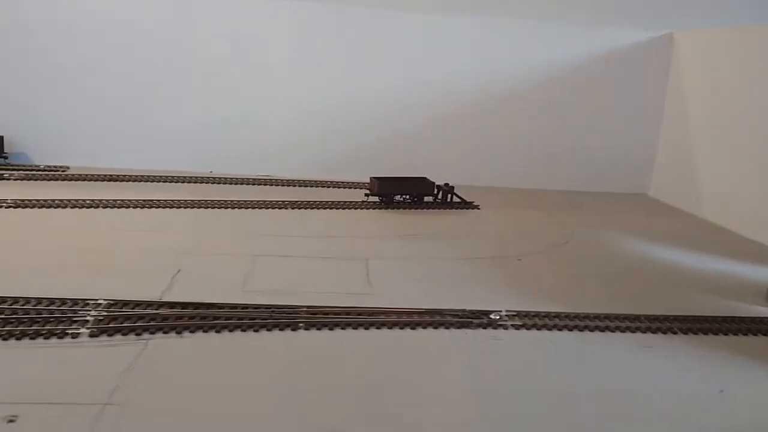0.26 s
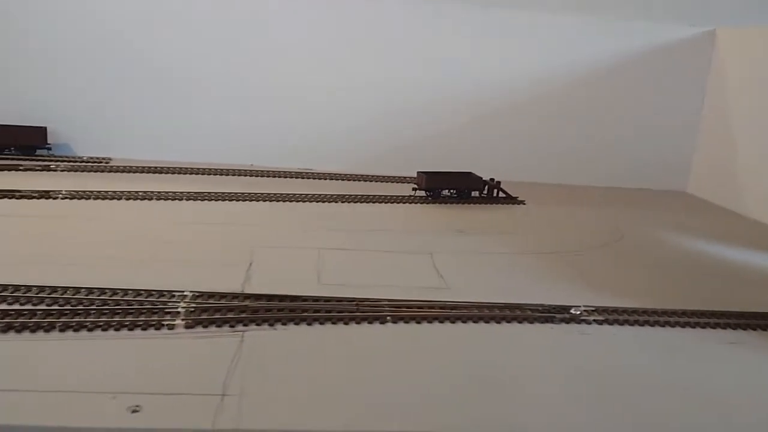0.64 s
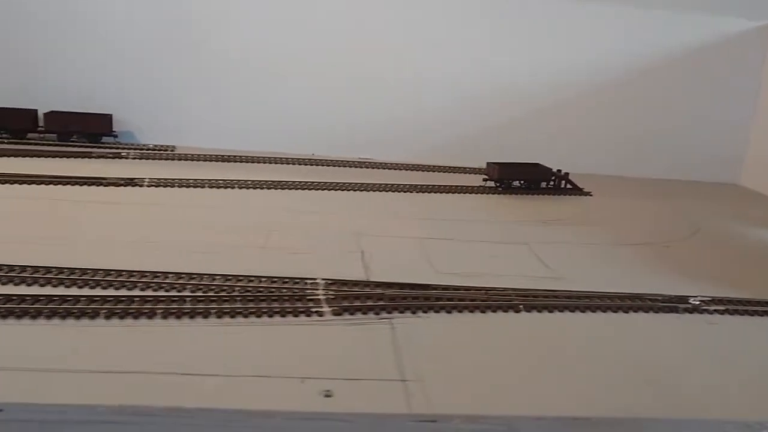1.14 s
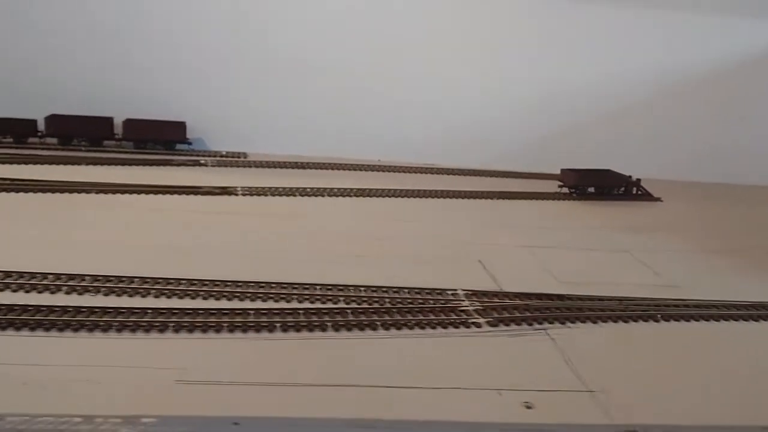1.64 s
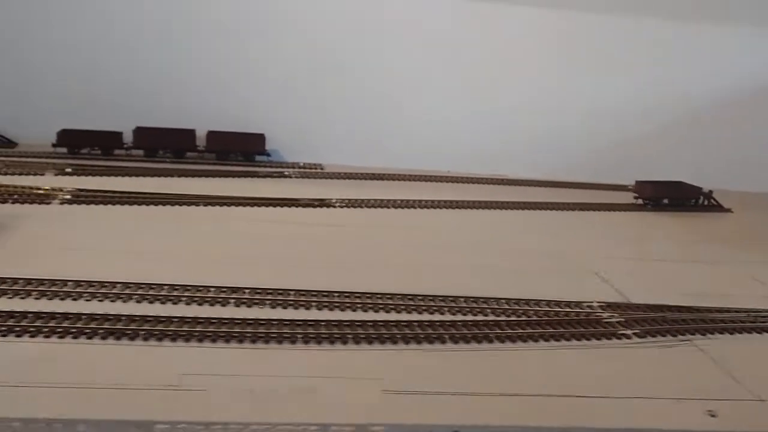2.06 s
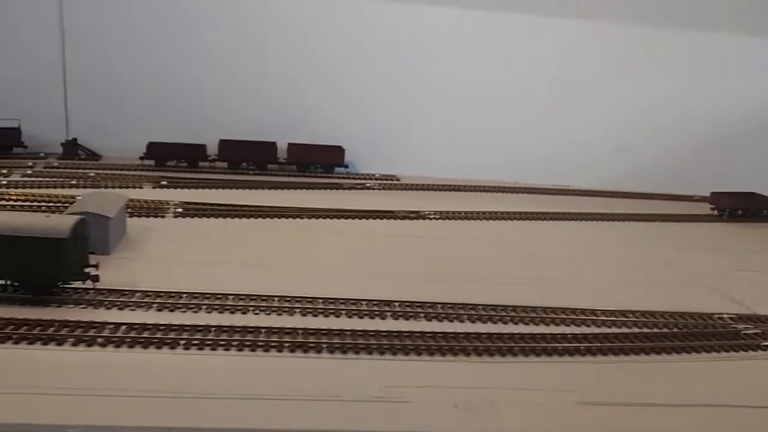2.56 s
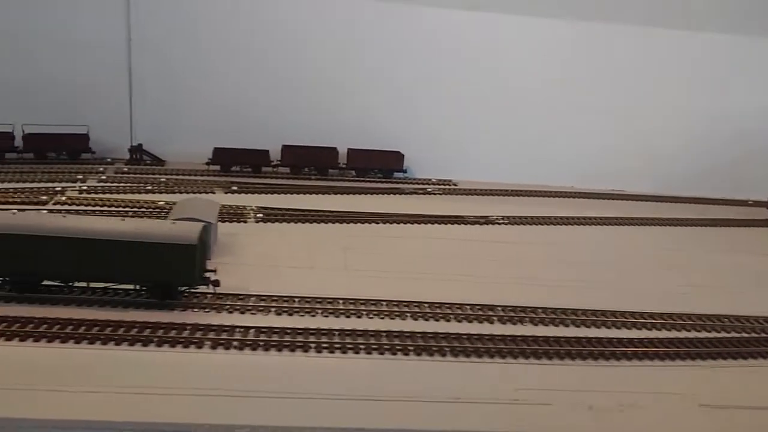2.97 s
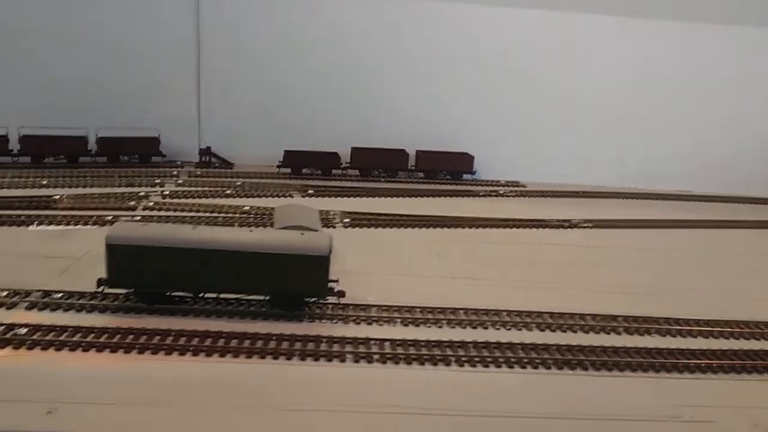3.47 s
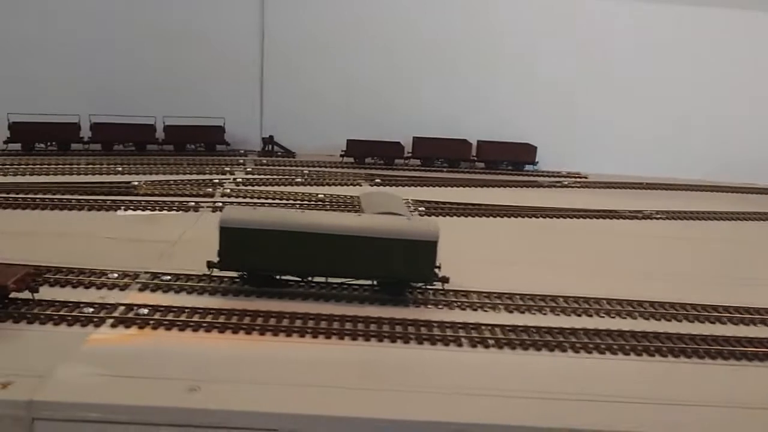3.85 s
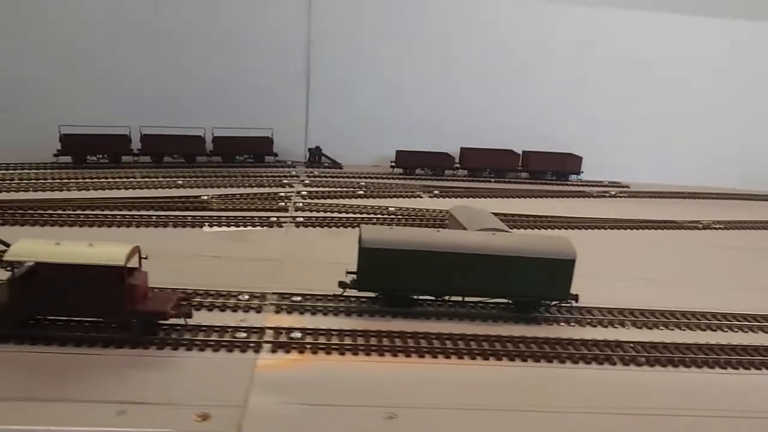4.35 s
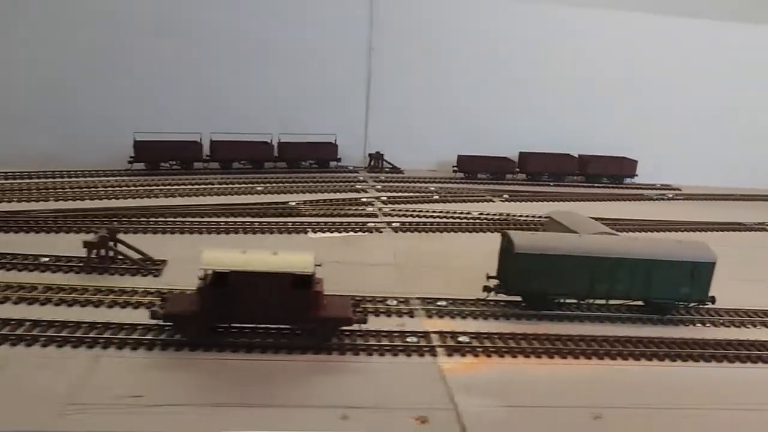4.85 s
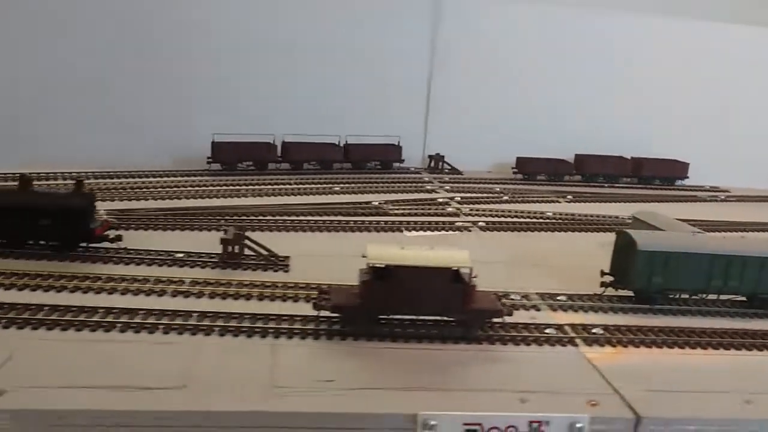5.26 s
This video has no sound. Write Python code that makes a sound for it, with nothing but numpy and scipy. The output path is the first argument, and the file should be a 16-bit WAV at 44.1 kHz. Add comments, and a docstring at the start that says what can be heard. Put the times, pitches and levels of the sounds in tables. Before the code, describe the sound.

A steady electrical hum runs indoors while fingers shift on a small carried camera, making scattered knocks, sharp clicks and faint rustles.

```python
"""A quiet room with a model railway, where something electrical hums and a small camera is carried along.
Shifts of the grip knock and click on its case and set it shuddering; fingertips pop beside the left
microphone port (the opening for the sound). Under them lie the rumble of the hand, skin brushing
the case, nail scrapes, a sliding sleeve, faint squeaks and the hiss of the two microphones."""
import sys
import numpy as np
from scipy import signal
from scipy.fft import rfft, irfft, next_fast_len
from scipy.io import wavfile
from scipy.ndimage import uniform_filter1d, map_coordinates

SR = 44100
rng = np.random.default_rng(int(sys.argv[2]) if len(sys.argv) > 2 else 0)


def store_wav(level_fs):
    """Save 16-bit WAV to argv[1]."""
    pcm = np.round(np.clip(np.atleast_2d(level_fs), -1, 1) * 32767)
    wavfile.write(sys.argv[1], SR, pcm.T.astype(np.int16))


N = 242991
TIME = np.arange(N) / SR
AGE = np.arange(SR // 6) / SR  # seconds since a touch
HZ = np.fft.rfftfreq(next_fast_len(N + SR // 2), 1 / SR)


def amp(db):
    """Turn decibels into a gain, the number a sound is multiplied by."""
    return 10 ** (np.asarray(db) / 20)


def unit(x):
    """Scale to an average (rms) strength of 1."""
    return x / np.sqrt(np.mean(x ** 2) + 1e-20)


def crest(x):
    """Scale to a peak of 1."""
    return x / np.abs(x).max()


def panned(db, lean_db):
    """Left and right gain. A lean above 0 turns the right side down; below 0, the left."""
    return amp(db + np.minimum([[lean_db], [-lean_db]], 0))


def add(track, s, sound):
    """Mix a stereo sound in at s seconds."""
    start = round(s * SR)
    track[:, start:start + sound.shape[-1]] += sound[:, :N - start]


def swells(rows):
    """A gain that rises and falls in smooth bell shapes."""
    return sum(amp(db) * np.exp(-((TIME - s) / half_length) ** 2) for s, half_length, db in rows)


def wobble(rate):
    """A smooth curve through rate random points a second."""
    points = rng.standard_normal(int(N * rate / SR) + 4)
    return map_coordinates(points, [TIME * rate])


def gains(colour, hz):
    """Left and right gain at each pitch, read from a tone colour table."""
    pitches, *sides = np.transpose(colour)
    return amp([np.interp(np.log(hz + 1), np.log(pitches), side) for side in sides])


def through(x, colour):
    """Give a sound a tone colour, using the quickest filter that never rings ahead of it."""
    size = 2048
    cepstrum = irfft(np.log(gains(colour, np.fft.rfftfreq(size, 1 / SR)) + 1e-6))
    fold = np.r_[1, np.full(size // 2 - 1, 2), 1, np.zeros(size // 2 - 1)]  # moves early ringing later
    response = irfft(np.exp(rfft(cepstrum * fold)))
    return signal.fftconvolve(np.atleast_2d(x), response, axes=1)[:, :x.shape[-1]]


def noise(gain, alike=0):
    """Stereo noise with this gain at each pitch; alike is the share both sides have in common."""
    white = rng.standard_normal((3, 2 * len(HZ) - 2))
    pair = np.sqrt(1 - alike) * white[:2] + np.sqrt(alike) * white[2]
    return irfft(rfft(pair) * gain)[:, :N] * np.sqrt(SR / 2)


def narrow(hz, width_hz, alike):
    """Noise gathered around one pitch."""
    return unit(noise(1 / (1 + ((HZ - hz) / width_hz) ** 2 / 2) ** 2, alike))


def patchy(x, depth_db):
    """Let the colour of a noise drift in small random patches."""
    spectrum = signal.stft(x, nperseg=512)[2]
    patches = uniform_filter1d(rng.standard_normal(spectrum.shape[1:]), size=4, axis=0)  # across pitch
    patches = uniform_filter1d(patches, size=12, axis=1)  # across time
    return signal.istft(spectrum * unit(amp(depth_db * unit(patches))), nperseg=512)[1][:, :N]


def spot(x, spread_db=2):
    """Every point of contact colours its sound a little differently."""
    hz = np.geomspace(300, 15000, num=14)
    return through(x, np.c_[hz, spread_db * rng.standard_normal((len(hz), 2))])


def ring(tones, scatter, wave=np.sin):
    """Tones that each fall 60 dB in their fade time, a little different at every blow."""
    chance = rng.standard_normal((len(tones), 2))
    return crest(sum(amp(db + louder - 60 * AGE / fade) * wave(2 * np.pi * hz * (1 + scatter * up) * AGE)
                     for (hz, db, fade), (louder, up) in zip(tones, chance)))


def slip(lead_s, grit_db, rise_s, fall_s):
    """Fine, bright friction builds up, lets go in one kick after lead_s and dies away."""
    t = AGE - lead_s
    grit = signal.lfilter([1, -.6], 1, rng.standard_normal(len(t)))
    force = amp(grit_db - 60 * np.maximum(-t / rise_s, t / fall_s)) * grit
    force[round(lead_s * SR)] += 1
    return force


def release(tones, lead_s, pull, build_s, soft_hz, order=2):
    """Suction builds up for a moment, then lets go: the pressure jumps and rings."""
    suction = -pull * np.exp((AGE[AGE < lead_s] - lead_s) / build_s)
    swing = np.r_[suction, ring(tones, scatter=.06, wave=np.cos)][:len(AGE)]
    soften = signal.butter(order, soft_hz, fs=SR, output="sos")
    return crest(signal.sosfilt(soften, swing))


def shudder(hz=68, sag=4.0, swell_s=0.0023, life_s=0.041):
    """The camera's weight swings a few times in the hand, slowing as it settles."""
    phase = 2 * np.pi * hz * (1 + 0.036 * rng.standard_normal()) * AGE / (1 + sag * AGE)
    return crest(np.sin(phase) * (1 - np.exp(-AGE / swell_s)) * np.exp(-(AGE / life_s) ** 2))


# colour of the microphones' own noise: (pitch [Hz], left [dB], right [dB])
MIC_COLOUR = [(97.4, -68, -105), (494, -93.5, -112), (890, -103, -107), (2680, -103, -107),
              (4140, -102, -114), (8600, -105, -106), (11100, -107, -106), (14100, -128, -122)]
# colour of a thin hiss: (pitch [Hz], left [dB], right [dB])
HISS_COLOUR = [(1000, -125, -118), (3400, -108, -97), (10600, -114, -104.5), (14000, -130, -112)]
# swells of that hiss: (middle [s], half length [s], level [dB])
HISS_SWELLS = [(0.2, 0.61, 5.5), (2.15, 1, 0.5)]

def hiss():
    """The microphones hiss steadily, and a thin hiss comes and goes twice on the right."""
    return noise(gains(MIC_COLOUR, HZ)) + swells(HISS_SWELLS) * noise(gains(HISS_COLOUR, HZ))


# noisy bands of the hum: (pitch [Hz], width [Hz], level [dB])
HUM_BANDS = [(183.8, 19, -54), (208, 37, -62.5), (236.8, 3.1, -63)]
# the hum fades as the camera moves on, then returns: (time [s], level [dB])
HUM_LEVELS = [(.5, 6.5), (2, 2.5), (4.6, -2.5), (5.3, 4.5)]

def hum(line_hz=176.9):
    """A low electrical drone with one clear tone, wavering as the camera moves through the room."""
    drone = sum(amp(db) * narrow(hz, width, alike=0.95) for hz, width, db in HUM_BANDS)
    pitch = line_hz + 3 * wobble(6)
    line = amp(-52 + 3 * wobble(5)) * np.sin(2 * np.pi * np.cumsum(pitch) / SR)
    level_db = np.interp(TIME, *np.transpose(HUM_LEVELS))
    return (drone + line) * amp(level_db) * amp([[1.5], [-2.5]])  # louder on the left


# faint squeaks: (middle [s], half length [s], pitch [Hz], level [dB])
FAINT_SQUEAKS = [(1.449, 0.0175, 1880, -57), (1.828, 0.035, 1154, -59.5), (3.895, 0.017, 784, -55)]

def squeaks():
    """Brief, faint, fuzzy tones."""
    return sum(swells([(s, half_length, db)]) * narrow(hz, width_hz=210, alike=0.44)
               for s, half_length, hz, db in FAINT_SQUEAKS)


# slides of a sleeve: (middle [s], half length [s], level [dB])
SLEEVE_SLIDES = [(4.38, 0.16, -69.5), (4.68, 0.22, -66)]

def sleeve():
    """Cloth slides past the left port with a soft, uneven rasp."""
    rasp = patchy(narrow(hz=1820, width_hz=650, alike=0.17), depth_db=-2.0)
    return panned(0, lean_db=16) * swells(SLEEVE_SLIDES) * amp(2.1 * wobble(18)) * rasp


# fingernail scrapes: (middle [s], half length [s], pitch [Hz], level [dB])
NAIL_SCRAPES = [(0.233, 0.0041, 3330, -40), (0.255, 0.018, 3300, -49.5), (3.24, 0.0053, 2820, -36.5),
                (4.065, 0.0023, 2730, -28)]

def scrapes():
    """A nail scrapes the case, stirring one bright ring each time, mostly on the right."""
    rasps = sum(swells([(s, half_length, db)]) * narrow(hz, width_hz=500, alike=0.044)
                for s, half_length, hz, db in NAIL_SCRAPES)
    return panned(0, lean_db=-15) * rasps


# how hard the hand works on the case: (time [s], effort [dB])
GRIP_EFFORT = [(0.0, -73.5), (2.16, -68.5), (2.45, -64), (2.83, -66.5), (3.41, -63), (3.95, -65.5),
               (5.5, -71)]
# skin slides over the case: (middle [s], half length [s], level [dB])
SKIN_SLIDES = [(0.245, 0.038, 6), (1.33, 0.39, -2), (3.555, 0.086, 11.5), (3.89, 0.018, 6)]
# colour of the hand's rumble: (pitch [Hz], left [dB], right [dB])
RUMBLE_COLOUR = [(21.6, -105, -82), (45.3, -60.5, -54.5), (57, -95, -54.5), (106, -88.5, -70.5),
                 (182, -68.5, -73.5), (252, -71.5, -73), (410, -110, -110)]
# colour of brushing skin: (pitch [Hz], left [dB], right [dB])
BRUSH_COLOUR = [(99, -100, -100), (346, -110, -90.5), (508, -87.5, -97), (790, -108, -94.5),
                (1398, -93, -101), (2760, -102, -104), (8950, -112, -124)]
# colour of catching skin: (pitch [Hz], left [dB], right [dB])
RUSTLE_COLOUR = [(203, -37, -4), (583, 19, -29), (3200, 6.5, 2), (14600, 9.5, -32)]

def hand(grains_per_s=600):
    """The hand rumbles through the case; skin brushes it and catches in tiny grains, more when pressed."""
    grip_db = np.interp(TIME, *np.transpose(GRIP_EFFORT))
    grip_db -= grip_db.mean()
    sliding = swells(SKIN_SLIDES)
    shaking = np.hypot(amp(-3.5 + 1.17 * grip_db), amp(-10) * sliding)
    brushing = np.hypot(amp(-1.5 + 0.77 * grip_db), sliding)
    rumble = shaking * amp(3.2 * wobble(7.3)) * noise(gains(RUMBLE_COLOUR, HZ), alike=0.81)
    brush = brushing * amp(1.6 * wobble(28)) * noise(gains(BRUSH_COLOUR, HZ), alike=.25)
    catches = rng.random(N) < grains_per_s / SR
    grains = catches * amp(5 * rng.standard_normal(N) + 4 * wobble(35))
    rustle = amp(-65.5) * brushing ** 1.4 * unit(through(grains, RUSTLE_COLOUR))
    return rumble + patchy(brush, depth_db=4.5) + rustle


# twitches of the hand: (time [s], level [dB])
HAND_JOLTS = [(4.174, -25.5), (5.376, -21)]

def jolts():
    """The hand twitches and only shakes the camera, with no tick."""
    out = np.zeros((2, N))
    for s, db in HAND_JOLTS:
        add(out, s, panned(db, lean_db=-20) * shudder())
    return out


# a finger shuts the left port for an instant: (time [s], pitch [Hz], level [dB])
PORT_CLACKS = [(0.2692, 700, -13), (2.4619, 960, -9.5), (2.552, 654, -22), (2.583, 495, -12),
               (3.632, 720, -22)]

def clacks(fade_s=0.0036):
    """A short, hollow drop of pressure; its pitch depends on how the finger covers the port."""
    out = np.zeros((2, N))
    onset = 1 - np.exp(-AGE / 0.00017)
    for s, hz, db in PORT_CLACKS:
        drop = -crest(ring([(hz, 0, fade_s)], scatter=0.036) * onset)
        add(out, s, panned(db, lean_db=22) * drop)
    return out


# a finger pad lands on the case: (time [s], level [dB], lean to the left [dB])
PAD_THUDS = [(2.8482, -14, -19), (2.940, -20, 10.5), (3.1293, -24, 20), (3.261, -20, 10), (3.379, -15, 7.5),
             (3.5506, -18, 4), (5.275, -39, -3)]
# tones of the air in a port, for thuds and pops: (pitch [Hz], level [dB], fade time [s])
AIR_TONES = [(100.6, 3.5, 0.054), (390, -12.5, 0.059)]

def thuds(lead_s=.002):
    """A soft finger pad gives a puff of air and a low bump whose pitch drops at once."""
    out = np.zeros((2, N))
    for s, db, lean_db in PAD_THUDS:
        bump = shudder(hz=167.4, sag=31.7, swell_s=0.0044, life_s=0.016)
        puff = release(AIR_TONES, lead_s, pull=0.41, build_s=0.0099, soft_hz=1030)
        add(out, s, panned(db, lean_db) * (bump + amp(-4) * puff))
    return out


# soft fingertip pops: (time [s], air level [dB], crack level [dB])
FINGER_POPS = [(0.2172, -21.5, -30.5), (0.254, -17, -26), (0.895, -13.5, -20.5), (1.3228, -14.5, -26.5),
               (1.3675, -10.5, -28.5), (1.3772, -20, -34), (1.7702, -12.5, -26.5), (2.3141, -13.5, -23.5),
               (2.3627, -10.5, -29), (2.369, -15.5, -44), (2.434, -12, -34), (2.444, -22, -30),
               (2.5606, -14.5, -21.5), (2.5829, -6.5, -28.5), (2.592, -16.5, -26), (2.942, -25.5, -25.5),
               (3.268, -16, -15)]
# colour of skin snapping free, for pops and clicks: (pitch [Hz], left [dB], right [dB])
SNAP_COLOUR = [(150, -10, -12), (900, 1, 2), (4000, -3, -8), (8000, -5, -8.5), (15000, -10, -9)]

def pops(lead_s=.002):
    """A fingertip leaves the case with a tiny crack and tugs at the air in the left port."""
    out = np.zeros((2, N))
    treble_dip = [(2500, 0, 0), (5000, -7, -7), (9000, 0, 0), (13000, -1, -1)]
    for s, air_db, crack_db in FINGER_POPS:
        air = release(AIR_TONES, lead_s, pull=0.51, build_s=0.00072, soft_hz=1275, order=3)
        force = slip(lead_s, grit_db=-3, rise_s=.005, fall_s=.002)
        crack = through(-crest(through(force, SNAP_COLOUR)), treble_dip)
        add(out, s - lead_s, panned(air_db, lean_db=22) * air + panned(crack_db, lean_db=38) * crack)
    return out


# knocks on the case: (time [s], shudder level [dB], tick level [dB])
CASE_KNOCKS = [(0.056, -39, -36.5), (0.5565, -20, -18), (0.932, -18, -16), (1.2246, -32, -30),
               (1.268, -16.5, -10.5), (1.563, -17.5, -9.5), (1.9475, -18.5, -12.5), (2.0304, -15.5, -15.5),
               (2.169, -16, -14.5), (2.299, -22, -15.5), (2.385, -19, -18), (2.716, -22, -14),
               (3.081, -24, -16.5), (3.2386, -31.5, -29), (3.6298, -25, -22.5), (3.655, -30.5, -29),
               (4.0668, -15, -13.5)]
# how the knocks change: (time [s], shudder's lean to the left [dB], tick's treble [dB])
KNOCK_CHANGES = [(2.7, 4, -0.5), (3.55, 15, -10), (4.06, -8.5, -6)]
# colour of a tick: (pitch [Hz], left [dB], right [dB])
TICK_COLOUR = [(208, -20, -20), (600, -16, 12.5), (830, -32, 1), (1220, -5, 11), (2040, -9.5, 5),
               (3560, -4, 1), (4970, -22, 0.5), (8900, -22, -20.5), (14900, -59, -41)]
# tones of the case by the right port: (pitch [Hz], level [dB], fade time [s])
CASE_TONES = [(1220, -3.5, 0.0022), (1920, -9, 0.0098), (3180, -4.5, 0.0039)]
# tone of the hollow behind the left port: (pitch [Hz], level [dB], fade time [s])
HOLLOW_TONE = [(507, 0, 0.01)]

def knocks(lead_s=.006):
    """The case ticks by the right port, rings hollow by the left one and shudders at both."""
    out = np.zeros((2, N))
    times, leans, trebles = np.transpose(KNOCK_CHANGES)
    hollow_onset = 1 - np.exp(-(AGE / 0.002) ** 2)
    for s, shudder_db, tick_db in CASE_KNOCKS:
        force = slip(lead_s, grit_db=-20, rise_s=.018, fall_s=.012)
        case = ring(CASE_TONES, scatter=.045)
        tick = crest(through(force, TICK_COLOUR))
        tick[1] += 0.85 * crest(signal.fftconvolve(force, case)[:len(AGE)])
        treble_db = np.interp(s, times, trebles)
        tick = through(tick, [(3400, 0, 0), (4000, treble_db, treble_db)])
        sides = panned(shudder_db, np.interp(s, times, leans))
        hollow = -amp(-1) * crest(ring(HOLLOW_TONE, scatter=0.036) * hollow_onset)
        add(out, s - lead_s, amp(tick_db) * crest(spot(tick)))
        add(out, s - .0011, sides * np.outer([1, 0], hollow))  # starts just before the tick
        add(out, s - .0005, sides * shudder())
    return out


def catch(lead_s, early_s=0.00118, width_s=0.00007):
    """The skin catches softly just before it snaps; the two together sound hollow and woody."""
    ahead_s = early_s * (1 + .08 * rng.standard_normal())
    pull = np.exp(-((AGE - lead_s + ahead_s) / width_s) ** 2)
    return -amp(-6) * pull / (pull.sum() + 1e-12)


# sharp clicks of the grip: (time [s], snap level [dB], snap's treble [dB],
# snap's lean to the left [dB], push level [dB], push's lean to the left [dB])
GRIP_CLICKS = [(0.2644, -17, 6.5, -6, -23, 8), (0.2686, 2, -10.5, 16, -6, 38),
               (2.453, -16, 7.5, 13, -12, 25), (2.4608, -7, 3.5, 7, -8.5, 11.5),
               (2.4951, -8, -1.5, 1, -8, 13.5), (2.5267, 0.5, -4.5, 13, -6, 17),
               (2.55, -3, -2.5, 22, -7, 12.5), (2.5781, 0.5, -8, 16, -19, 28),
               (3.1291, 4.5, -5, 15.5, -7.5, 10.5), (3.1966, -4.5, -2, 13.5, -18, 10.5),
               (3.2625, -11.5, -4, 18, -13, 17), (3.3798, -2.5, -4.5, 12.5, -35, -1),
               (3.5493, -2, 4, 11, -8.5, 13.5), (3.6078, -3, -5.5, 29.5, -11, 8.5)]
# tones of the case when the grip pushes it: (pitch [Hz], level [dB], fade time [s])
PUSH_TONES = [(95, 9.5, 0.036), (171, 0.5, 0.0079), (400, -1.5, 0.027)]

def clicks(lead_s=.003, push_early_s=0.00027):
    """The grip sticks and snaps free: a low push, a sharp snap just after it, then a shudder."""
    out = np.zeros((2, N))
    for s, snap_db, treble_db, snap_lean_db, push_db, push_lean_db in GRIP_CLICKS:
        force = slip(lead_s, grit_db=-17, rise_s=.006, fall_s=.007) + catch(lead_s)
        snap = spot(through(force, SNAP_COLOUR))
        snap /= np.abs(snap).max(axis=1, keepdims=True)
        snap = through(snap, [(3800, 0, 0), (5340, treble_db, treble_db)])
        push = release(PUSH_TONES, lead_s, pull=0.35, build_s=0.0017, soft_hz=830)
        add(out, s - lead_s, panned(snap_db, snap_lean_db) * snap)
        add(out, s - lead_s - push_early_s, panned(push_db, push_lean_db) * push)
        add(out, s + lead_s, panned(push_db - push_lean_db - 3, lean_db=0) * shudder())
    return out


def scene():
    """Handling sounds over the hum and the hiss."""
    contacts = knocks() + jolts() + thuds() + pops() + clicks() + clacks()
    return contacts + hand() + sleeve() + scrapes() + squeaks() + hum() + hiss()


# colour that the two ports give every sound: (pitch [Hz], left [dB], right [dB])
PORT_COLOUR = [(3200, -2.5, -2.5), (4840, -2, -13.5), (5860, -13.5, -30), (6210, -19.5, -30),
               (7940, -1, -12.5), (9060, 1.5, -32), (10520, -5.5, -8.5), (11700, -28, -23.5),
               (16700, -28.5, -28.5)]

def record(dry):
    """Each port has its own dips and peaks; deep bass and the highest treble are cut."""
    low_cut_hz, high_cut_hz = 40, 16000
    bass_cut = HZ ** 4 / np.hypot(HZ ** 4, low_cut_hz ** 4)
    spectrum = rfft(through(dry, PORT_COLOUR), 2 * len(HZ) - 2)
    return irfft(spectrum * bass_cut * (HZ < high_cut_hz))[:, :N]


dry = scene()
out = record(dry)
store_wav(out)
```